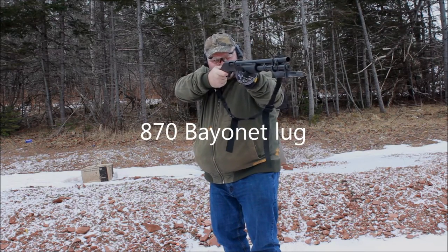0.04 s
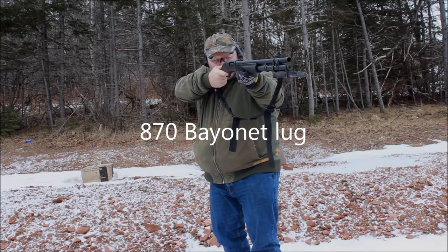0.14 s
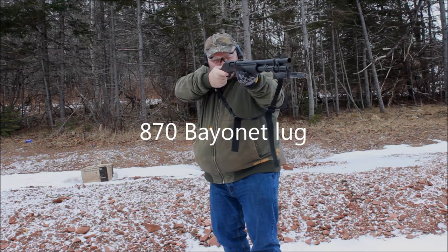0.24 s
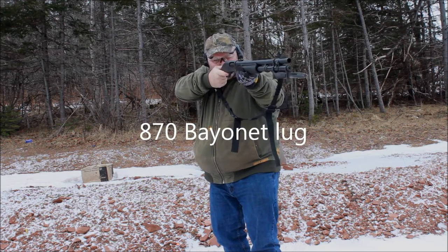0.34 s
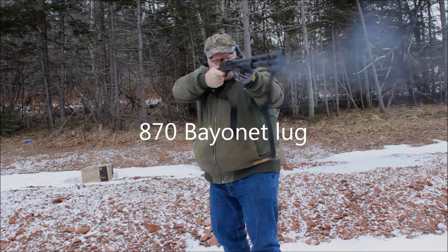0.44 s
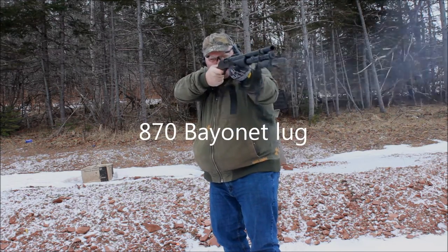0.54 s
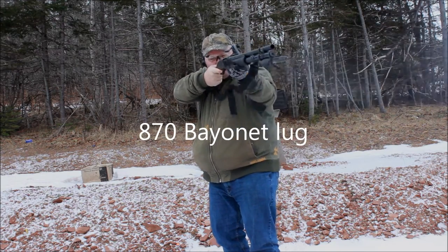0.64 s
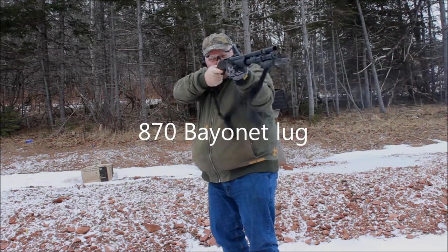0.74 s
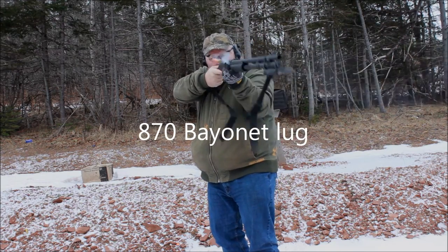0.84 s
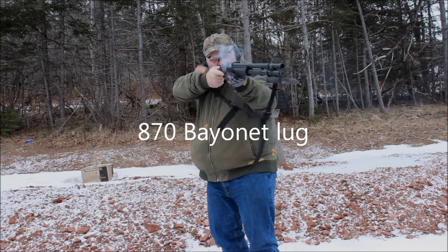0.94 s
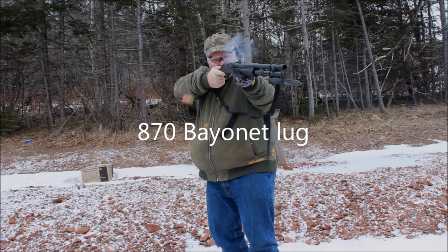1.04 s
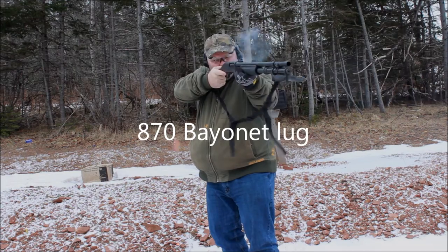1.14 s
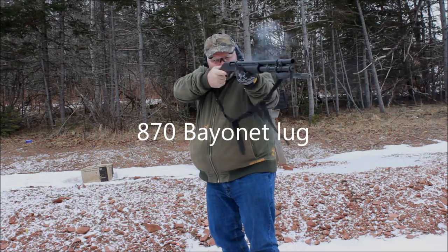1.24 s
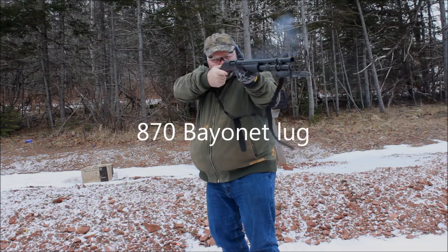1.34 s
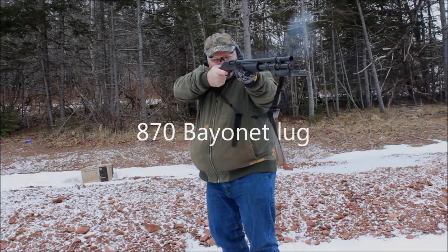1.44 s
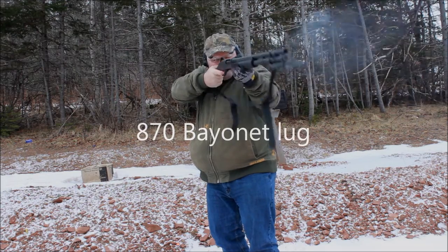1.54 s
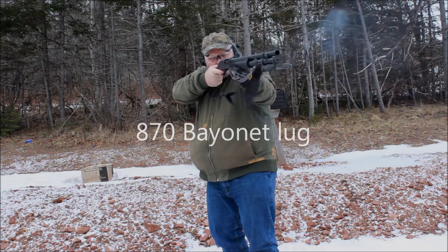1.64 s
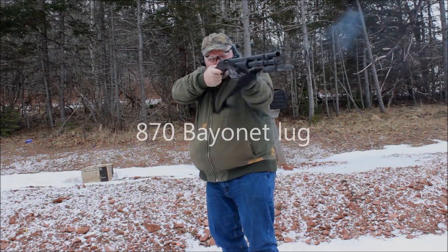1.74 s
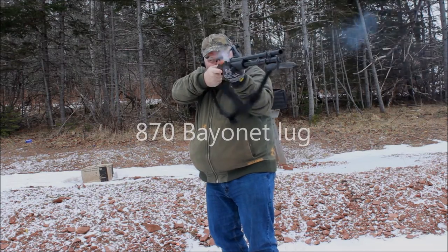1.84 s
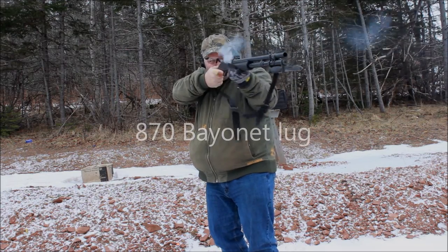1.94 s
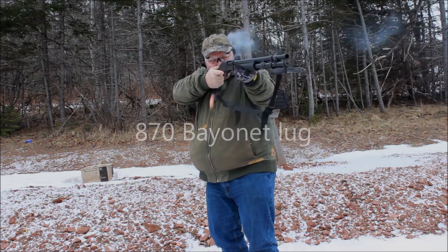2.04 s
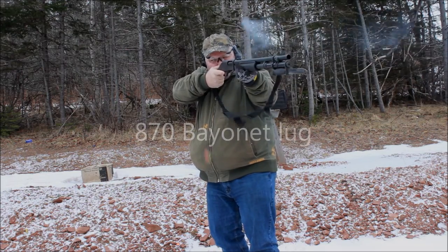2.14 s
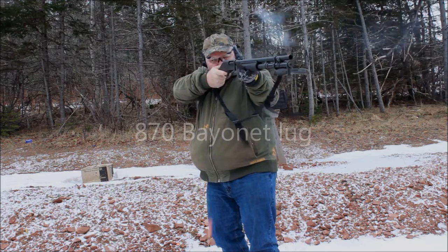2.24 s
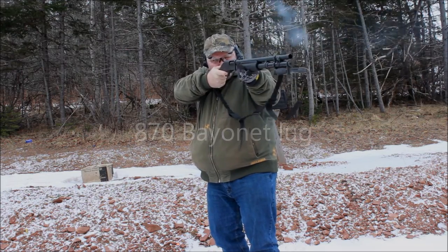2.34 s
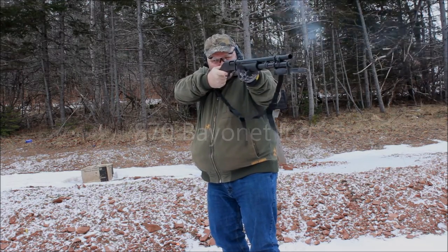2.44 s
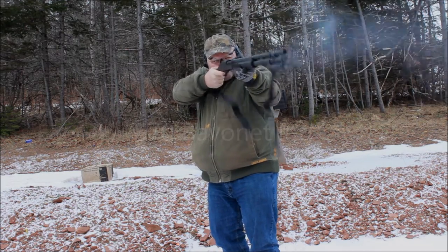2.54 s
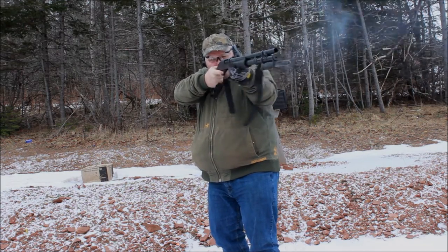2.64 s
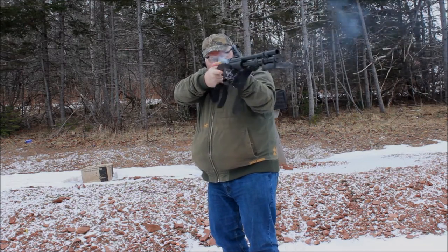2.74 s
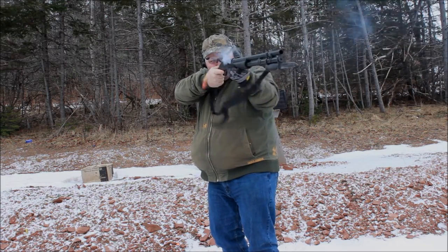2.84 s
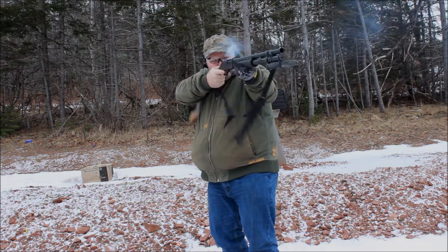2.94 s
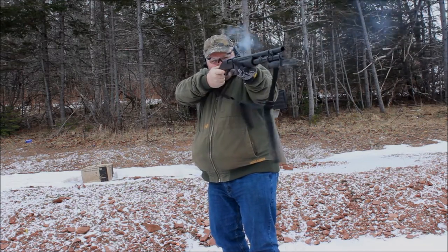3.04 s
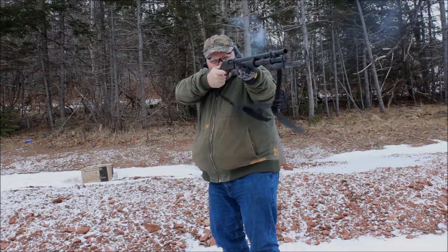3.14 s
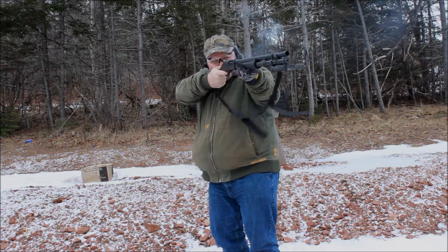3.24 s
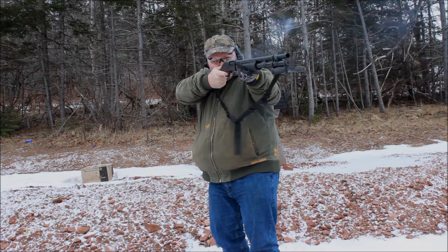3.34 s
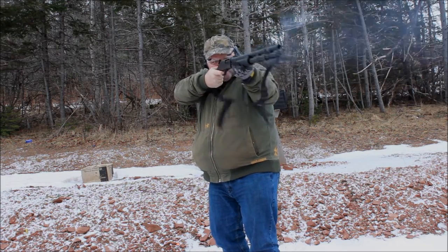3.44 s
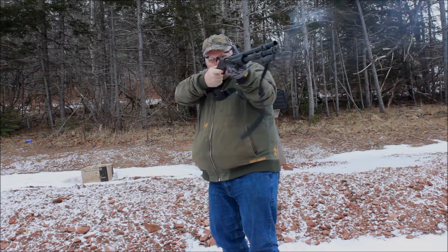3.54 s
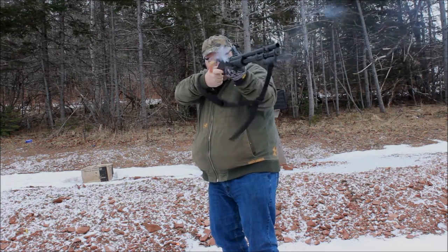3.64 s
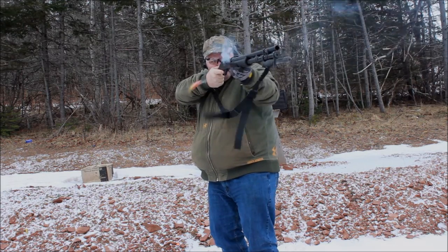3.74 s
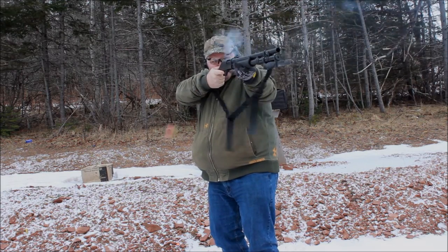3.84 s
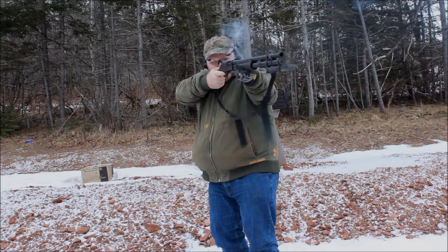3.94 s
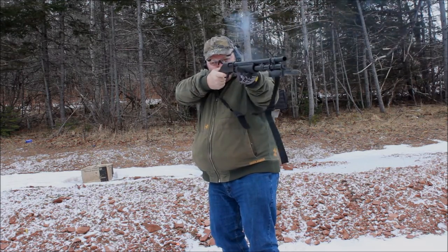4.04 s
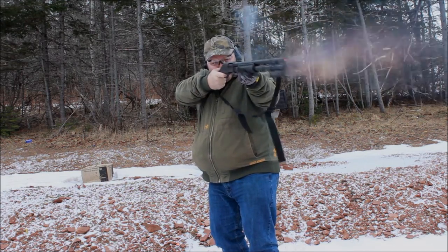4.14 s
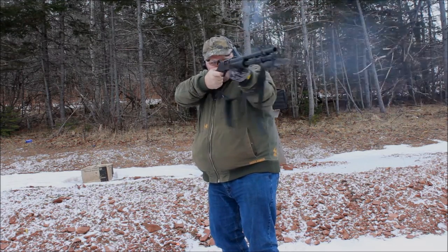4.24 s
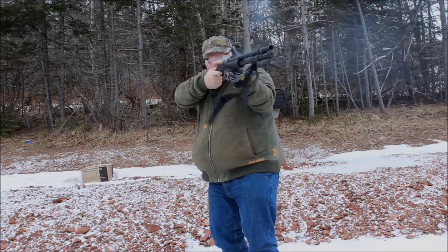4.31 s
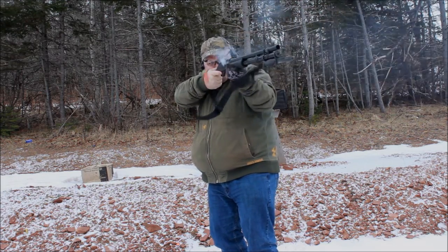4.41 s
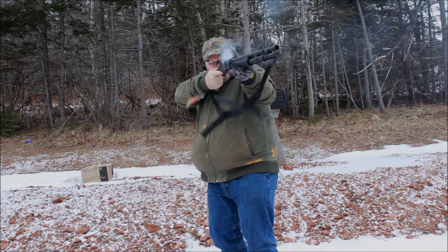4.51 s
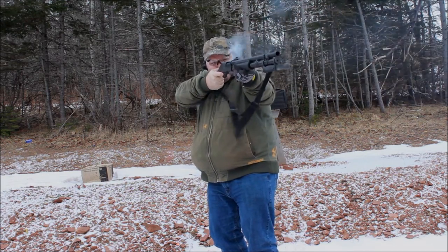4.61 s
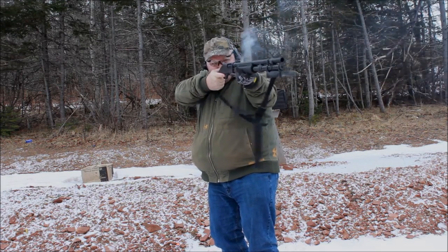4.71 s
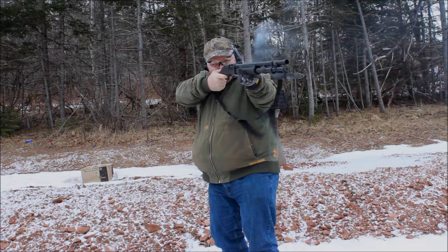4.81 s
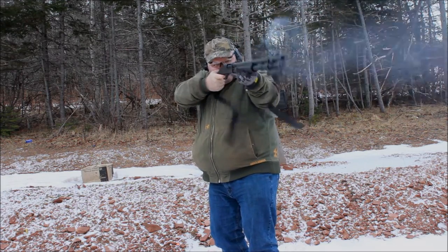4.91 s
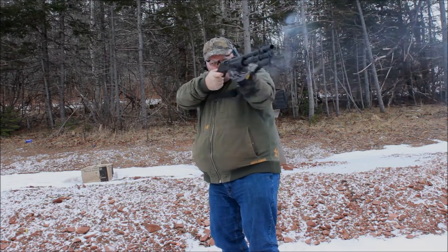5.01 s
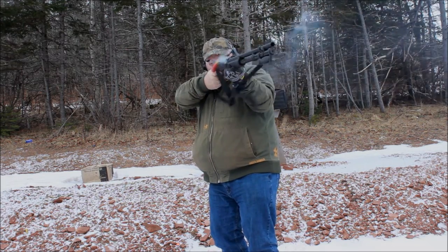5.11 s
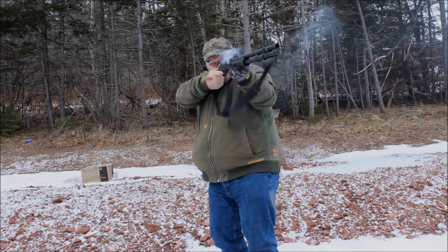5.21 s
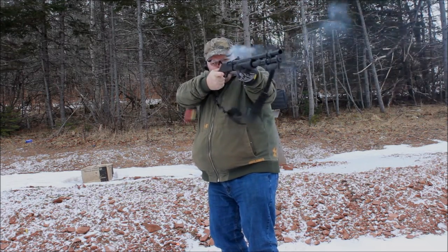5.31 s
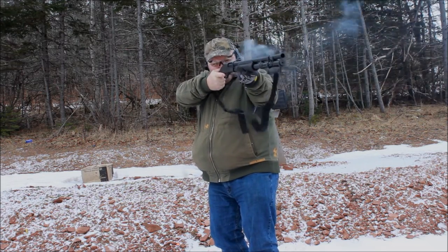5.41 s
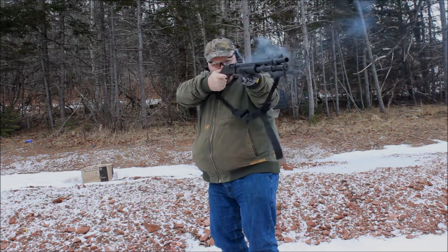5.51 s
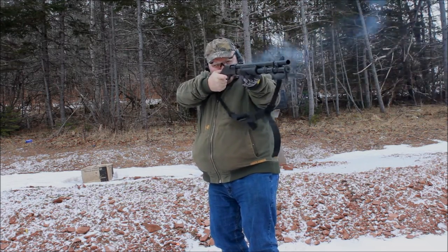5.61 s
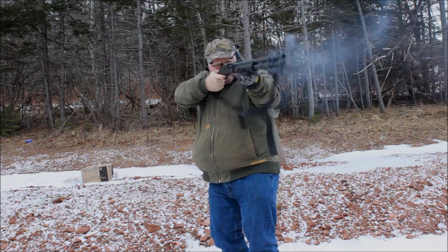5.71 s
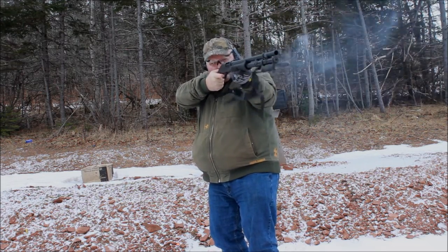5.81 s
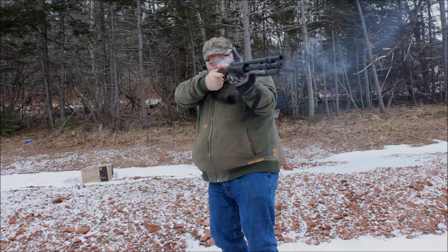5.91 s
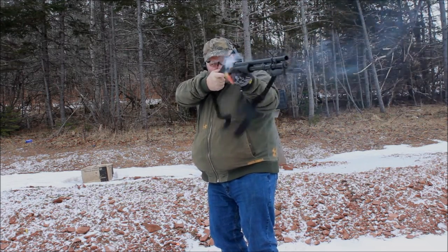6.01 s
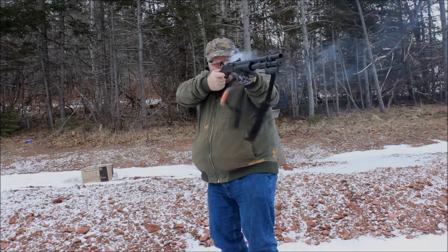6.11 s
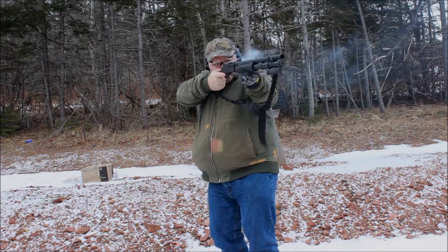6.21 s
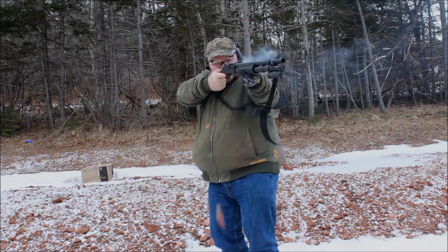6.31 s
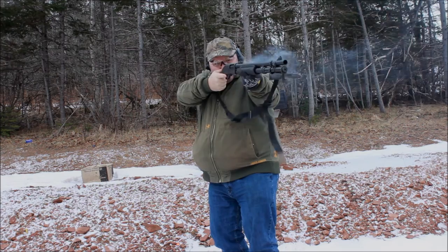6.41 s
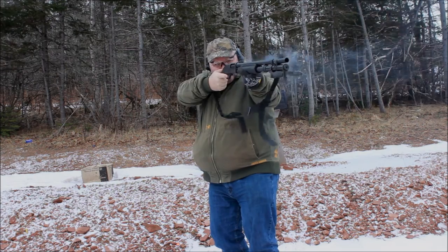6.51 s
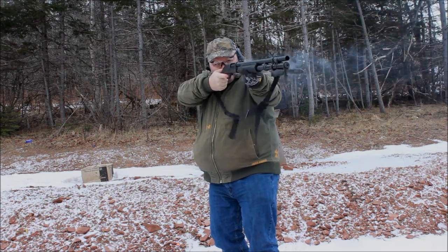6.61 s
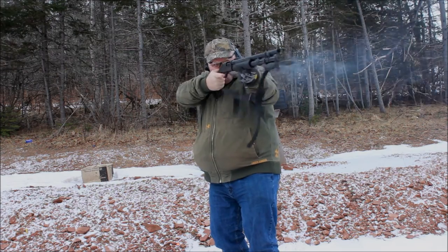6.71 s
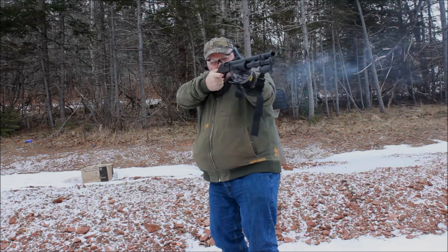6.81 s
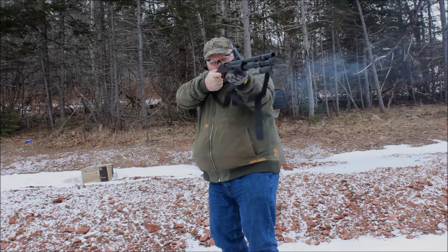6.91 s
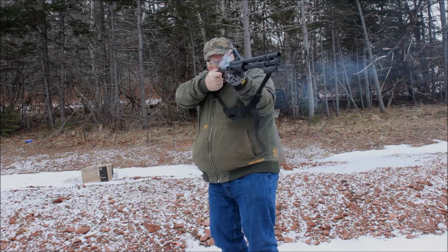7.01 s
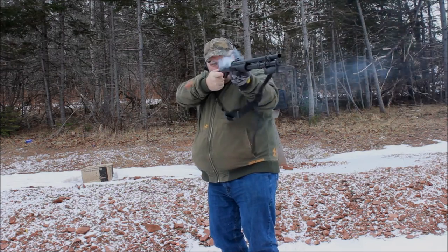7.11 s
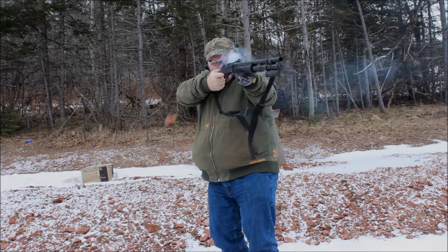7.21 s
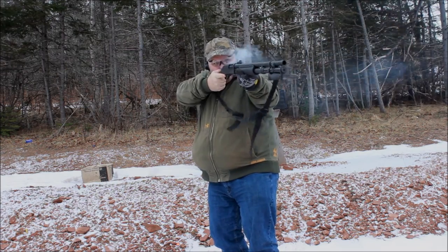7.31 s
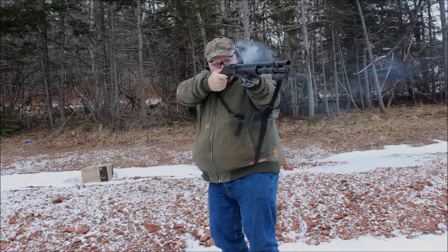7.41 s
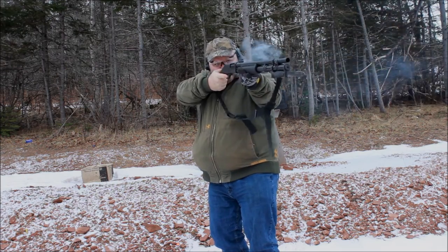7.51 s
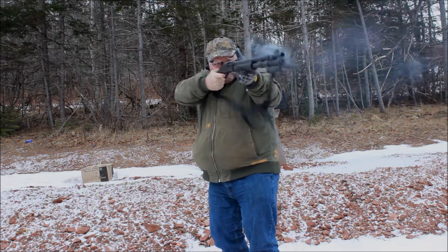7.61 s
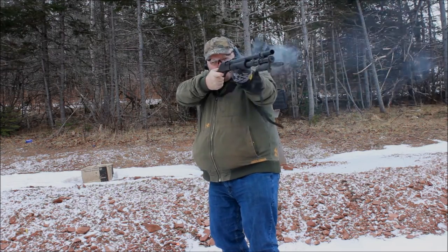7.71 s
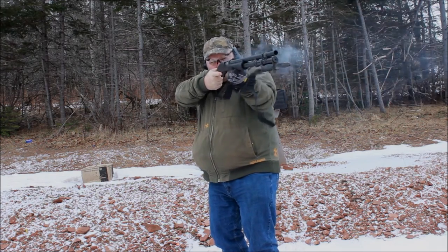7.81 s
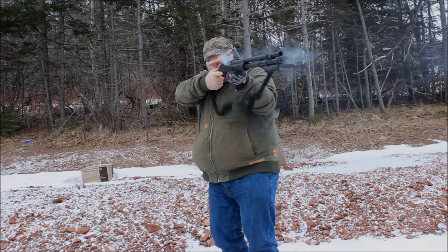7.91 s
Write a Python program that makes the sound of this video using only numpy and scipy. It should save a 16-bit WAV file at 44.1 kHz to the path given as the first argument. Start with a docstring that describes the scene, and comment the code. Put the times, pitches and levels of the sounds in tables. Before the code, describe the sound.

Outdoors beside trees, quick steady shotgun fire: hard distorted bang, brief crackling buzz, scattered echoes fading into a swelling distant rush. A two-part steel pump stroke, back then forward with small rattles, fills each gap, and some spent shells crack or pop hollowly on stones. Low wind rumbles underneath. The mono recorder ducks after each shot, then creeps back up.

```python
"""Light wind rumbles on the microphone at the edge of a wood, then a pump shotgun is fired nine times.
Each blast is an overloading burst of noise with a buzz off ground and trunks; decaying bands of noise
and delayed thumps and slaps answer from the trees and banks, and a dull roll swells until the next shot.
Between shots the slide scrapes, shaped noise and ringing modes make its steel contacts, and empty hulls
crack and pop on the gravel, while the recorder's gain control creeps back up."""
import sys
import numpy as np
from scipy import signal
from scipy.fft import rfft, irfft, next_fast_len
from scipy.io import wavfile
from scipy.ndimage import uniform_filter1d

SR = 44100
rng = np.random.default_rng(int(sys.argv[2]) if len(sys.argv) > 2 else 0)


def transcribe(signal):
    """Save signal, clipped to [-1, 1], as a 16-bit WAV file at the path in sys.argv[1]."""
    frames = np.atleast_2d(signal).T
    limited = np.clip(frames, -1, 1)
    pcm = np.round(limited * 32767).astype(np.int16)
    wavfile.write(sys.argv[1], SR, pcm)


N = 350595
TIME = np.arange(N) / SR

# Scene levels stand ahead of the recorder's gain; spectra give only a shape, as noise is set to rms 1.
# shots: start_s, blast_db, overload_s, buzz_db, buzz_delay_s, scatter_db, woods_db
SHOTS = [(0.4660, 11, 0.0086, -5.5, 0.012, -5.5, -14.5), (1.5359, 9.5, 0.009, -7.5, 0.023, -14.5, -12),
         (2.5465, 17.5, 0.0096, -6, 0.0072, -9.5, -13), (3.4066, 16, 0.0085, -5.5, 0.0062, -11.5, -15),
         (4.184, 10, .0078, -10, 0.0073, -8, -15), (4.9242, 14.5, 0.0076, -5.5, 0.011, -9.5, -14.5),
         (5.7200, 18.5, 0.007, -12.5, 0.024, -15, -14), (6.672, 18.5, 0.0073, -8.5, 0.0099, -8.5, -15),
         (7.6197, 15.5, 0.0078, -7.5, 0.0061, -6, -14.5)]
# pump strokes: slide_start_s, back_stop_s, stop_db, rebound_after_s, slam_s, slam_db, scrape_db
PUMPS = [(0.77, 0.856, -9, .051, 1.068, -7.5, -51), (1.774, 1.8444, -9, .057, 2.0297, -5, -46),
         (2.724, 2.7414, -17, .05, 2.942, -11, -51), (3.58, 3.605, -16, .046, 3.8107, -16, -57),
         (4.31, 4.3206, -17, .048, 4.5489, -11.5, -56), (5.07, 5.0888, -18.5, .044, 5.3105, -14, -59),
         (5.9, 5.9105, -17, .041, 6.2437, -15.5, -61), (6.93, 6.981, -14, .045, 7.219, -8, -54),
         (7.805, 7.875, -13, .056, 8.11, -10, -65)]
# noise of steel on steel: pitch_hz, relative_db
STEEL_NOISE = [(290, -26), (500, -9), (1620, -2.5), (2840, -4), (4390, -1.5), (5700, -7), (7190, -4),
               (9200, -9.5), (15100, -11.5), (16000, -8.5)]


def from_db(db):
    """Turn decibels into an amplitude factor."""
    return 10 ** (np.asarray(db) / 20)


def rms_one(x):
    """Scale a signal to rms 1."""
    return x / np.sqrt(np.mean(x ** 2) + 1e-20)


def at_hz(points, hz):
    """Read a curve of (hz, value) points, straight between them on a log frequency axis."""
    point_hz, value = np.array(points).T
    return np.interp(np.log(hz), np.log(point_hz), value)


def clicks(times, heights):
    """One sample for each event."""
    out = np.full(N, 1e-18)
    np.add.at(out, (np.asarray(times) * SR).astype(int), heights)
    return out


def dying(pulses, t60):
    """Each pulse starts an exponential decay of 60 dB in t60 seconds."""
    return signal.lfilter([1], [1, -from_db(-60 / (t60 * SR))], pulses)


def ring(pulses, hz, t60):
    """A unit click sets a decaying sine of starting height 1 ringing."""
    r = from_db(-60 / (t60 * SR))
    w = 2 * np.pi * hz / SR
    return signal.lfilter([0, np.sin(w)], [1, -2 * r * np.cos(w), r * r], pulses)


def drift(rate_hz):
    """Slow random wander with spread 1, made at one fortieth of the sample rate."""
    r = np.exp(-80 * np.pi * rate_hz / SR)
    noise = rng.standard_normal(N // 40 + 2002)
    slow = signal.lfilter([1], [1, -2 * r, r * r], noise)[2000:]   # skip the filter's start
    return np.interp(np.arange(N) / 40, np.arange(len(slow)), rms_one(slow))


def coloured(spectrum):
    """Steady noise of the given spectrum, rms 1."""
    size = next_fast_len(N)
    hz = np.maximum(np.arange(size // 2 + 1) * SR / size, 1)
    shaped = rfft(rng.standard_normal(size)) * from_db(at_hz(spectrum, hz))
    return rms_one(irfft(shaped, size)[:N])


def after_shots(response):
    """The same answer follows every shot, scaled by that shot's woods level."""
    size = next_fast_len(N + len(response))
    start = clicks([row[0] for row in SHOTS], from_db([row[6] for row in SHOTS]))
    return irfft(rfft(start, size) * rfft(response, size), size)[:N]


def wind_and_low_tails():
    """Lumpy wind rumble, mostly below 150 Hz, joined by the low rumbling tail of each shot."""
    # light wind on the microphone: time_s, level_db
    gusts = [(0.0, -64), (0.6, -65), (1.1, -58), (1.9, -55), (2.6, -56), (2.85, -63), (3.3, -58),
             (4.0, -61), (4.8, -56), (5.3, -65), (6.2, -58), (7.0, -67), (7.45, -64), (7.52, -54),
             (7.95, -62)]
    s, level_db = np.transpose(gusts)
    tail_db, tail_t60_s = -32, .65   # level over the shot's woods level
    low_tails = after_shots(from_db(tail_db - 60 * TIME[:SR] / tail_t60_s))
    level = from_db(np.interp(TIME, s, level_db)) + low_tails
    rumble = coloured([(15, -44), (40, -15.5), (85, 0), (130, -1), (250, -27), (1000, -85)])
    return level * from_db(1.3 * drift(4.9)) * rumble


def open_air():
    """A faint bed of noise, strongest between 400 and 800 Hz, wavers slightly in level."""
    # background spectrum: pitch_hz, relative_db
    air_spectrum = [(60, -18), (150, -9), (400, -3.5), (800, -4.5), (2000, -18), (5000, -23.5),
                    (16000, -30.5)]
    return from_db(-59 + 1.0 * drift(3)) * coloured(air_spectrum)


def muzzle():
    """The blast holds for a few ms, bright first, then deep; ground and trunks send back a buzz near 1 kHz."""
    # spectrum of the deep blast: pitch_hz, relative_db
    blast_spectrum = [(20, -29.5), (60, -12.5), (200, -0.5), (900, -1), (2500, -7), (6000, -13),
                      (16000, -22)]
    # spectrum of the bright scatter: pitch_hz, relative_db
    scatter_spectrum = [(35, -34), (60, -27), (635, -14.5), (1110, -2.5), (1540, -5.5), (2290, -4),
                        (2580, -22), (2900, -7.5), (12600, -27.5), (16000, -26.5)]
    buzz_hz, buzz_width_hz, buzz_end_s = 960, 330, .033   # end counted from the shot
    crack, boom, ground, rush = np.zeros((4, N))
    for s, blast_db, overload_s, buzz_db, delay_s, rush_db, _ in SHOTS:
        t = TIME - s
        rise = np.exp(np.minimum(t, 0) / .00013)
        hold = from_db(blast_db) * rise * np.exp(-np.maximum(t - overload_s, 0) / 0.0005)
        crack += hold * np.exp(-t.clip(0) / 0.0021)
        boom += hold
        swell = 1 / (1 + np.exp(np.clip((delay_s - t) / .001, -50, 50)))
        end = np.exp(-np.maximum(t - buzz_end_s, 0) / .002)
        ground += swell * from_db(buzz_db - 120 * (t - delay_s).clip(0)) * end
        rush += np.where(t > 0, from_db(rush_db - 480 * (t - overload_s).clip(0)), 0)
    narrow = ring(rng.standard_normal(N), buzz_hz, 2.4 / buzz_width_hz)
    buzz = np.tanh(1.3 * rms_one(narrow))   # the strained capsule evens the swing
    buzz = buzz - 0.55 * (buzz ** 2 - np.mean(buzz ** 2))   # and sharpens the rarefactions
    bright = coloured([(300, -16), (2500, 1), (8000, -3.5), (16000, -4.5)])
    blast = boom * coloured(blast_spectrum) + from_db(-5.5) * crack * bright
    return blast + ground * buzz + rush * coloured(scatter_spectrum)


def woods():
    """Scatter from the trees dies band by band, quick then slow; the treble swells again from the crowns."""
    # spectrum of the scatter: pitch_hz, relative_db
    woods_spectrum = [(24, -54), (40, -20), (189, -3), (354, -1.5), (630, -2), (917, 7), (988, -8),
                      (1300, -5), (1670, -7.5), (4790, -18.5), (16000, -38.5)]
    # decay scale, shortened or stretched below for the quick and slow parts: pitch_hz, decay_scale_s
    woods_decay = [(50, .5), (200, 0.73), (500, 0.46), (1000, 0.38), (2500, 1), (5000, 0.89), (9000, 0.44),
                   (15000, 0.45)]
    start = clicks([row[0] + 0.014 for row in SHOTS], from_db([row[6] for row in SHOTS]))
    noise, out = [coloured(woods_spectrum), coloured(woods_spectrum)], 0
    edges = 35 * 2 ** np.arange(0, 9.1, .5)   # half-octave bands
    for k, (low, high) in enumerate(zip(edges, edges[1:])):
        band_filter = signal.butter(2, [low, high], "band", fs=SR, output="sos")
        band = signal.sosfilt(band_filter, noise[k % 2])   # neighbours use separate noises
        decay_s = at_hz(woods_decay, np.sqrt(low * high))
        quick = from_db(-4.5) * dying(start, .2 * decay_s)
        slow = from_db(-8.5) * dying(start, 1.685 * decay_s)
        out = out + band * (quick + slow)
    crowns_s, crowns_width_s = 0.078, 0.032   # peak after the shot and width of the swell
    crowns = after_shots(from_db(-21) * np.exp(-((TIME[:SR // 4] - crowns_s) / crowns_width_s) ** 2))
    treble = coloured([(1000, -18.5), (3000, 1.5), (8000, -4.5), (16000, -18.5)])
    return out * from_db(2.1 * drift(30)) + crowns * treble


def echoes():
    """Each reflector returns a soft low thump and a short slap of the middle range."""
    # banks, stands of trees and the backstop answer every shot alike: delay_s, thump_db, slap_db
    reflectors = [(.030, -14, -21), (0.042, -17, -8), (0.055, -27, -14), (.062, -15, -8.5),
                  (.082, -25, -11), (.100, -30, -27), (.128, -20, -14), (0.144, -20, -22), (.166, -29, -35),
                  (.176, -9.5, -15), (.191, -29, -20.5), (0.209, -18.5, -17.5), (.225, -15, -16),
                  (.236, -18, -29), (0.251, -22.5, -24.5)]
    # low modes of the thump: pitch_hz, relative_db, t60_s
    thump_modes = [(140, -7, 0.024), (235, 2.5, .065), (310, -1, 0.035)]
    delay_s, thump_db, slap_db = np.transpose(reflectors)
    soft = signal.lfilter([.05], [1, -.95], clicks(delay_s, from_db(thump_db)))
    thump = sum(from_db(level_db) * ring(soft, hz, t60) for hz, level_db, t60 in thump_modes)
    thump = signal.sosfilt(signal.butter(3, [110, 450], "band", fs=SR, output="sos"), thump)
    smear = dying(dying(clicks(delay_s, from_db(slap_db)), 0.021), 0.021) / 60
    middle = coloured([(300, -21), (700, -0.5), (1000, -1), (2000, -5.5), (4000, -24), (9000, -45.5)])
    return after_shots((thump + smear * middle)[:SR // 2])


def far_roll():
    """Distant slopes return a dull, lumpy rush that is reset at each shot and swells until the next."""
    # spectrum of the distant rush: pitch_hz, relative_db
    far_spectrum = [(88, -46.5), (150, -12.5), (298, -13.5), (449, -9.5), (489, -9), (891, 0), (1060, -1.5),
                    (1390, -9), (2030, -8), (2210, -13.5), (3890, -27), (4460, -35.5), (9000, -70.5),
                    (11700, -99), (19800, -120)]
    roll_db, swell_db_per_s = -27, 6.5   # just after a shot, over its woods level; growth until the next
    s, woods_db = np.transpose(SHOTS)[[0, 6]]
    last = np.maximum(np.searchsorted(s, TIME) - 1, 0)
    after_first = np.clip((TIME - s[0]) / .05, 0, 1)
    level_db = woods_db[last] + roll_db + swell_db_per_s * (TIME - s[last])
    return after_first * from_db(level_db + 2.0 * drift(43)) * coloured(far_spectrum)


def slide():
    """The action bars scrape along the receiver in dense, uneven ticks."""
    stroke = np.zeros(N)
    for start_s, _, _, _, slam_s, _, scrape_db in PUMPS:
        inside_s = np.minimum(TIME - start_s, slam_s + .012 - TIME)
        stroke += from_db(scrape_db) * np.clip(inside_s / .03, 0, 1)
    heights = from_db(2.1 * np.minimum(rng.exponential(1, N), 3))
    ticks = (rng.random(N) < 150 / SR) * heights   # about 150 a second
    grit = rms_one(dying(ticks + 1e-18, .04) + 0.39)
    return stroke * grit * coloured(STEEL_NOISE)


def contacts():
    """Every steel contact of the action as rows: time_s, level_db, decay_scale_s."""
    # small ticks of the action, unlocking among them: time_s, level_db
    small_ticks = [(0.7781, -30), (0.8265, -34), (0.9717, -26), (0.9946, -25.5), (1.0316, -29),
                   (1.2466, -38.5), (1.784, -20), (1.938, -26), (1.9494, -26), (1.965, -28), (2.5042, -40),
                   (2.8394, -34), (2.876, -23), (3.72, -32), (3.745, -30), (4.401, -37), (4.4757, -33),
                   (4.634, -33.5), (5.21, -33), (5.238, -25.5), (6.0297, -31), (6.0543, -27), (6.099, -37),
                   (6.1434, -33.5), (6.549, -40.5), (6.9434, -36), (7.1085, -30), (7.1372, -30),
                   (7.1631, -38), (7.183, -31), (7.4195, -36.5), (7.8341, -35)]
    # rebound after the back stop: level_under_stop_db, decay_scale_s
    rebound_db, rebound_decay_s = (-12.5, .055)
    # carrier before the slam, lock after it: lag_s, level_under_slam_db, decay_scale_s
    carrier, lock = (-.022, -17, .045), (.0075, -5, .055)
    stop_decay_s, slam_decay_s, tick_decay_s = .053, .047, .05
    rows = [(s, db, tick_decay_s) for s, db in small_ticks]
    for _, stop_s, stop_db, rebound_s, slam_s, slam_db, _ in PUMPS:
        rows.append((stop_s, stop_db, stop_decay_s))
        rows.append((slam_s, slam_db, slam_decay_s))
        rows.append((stop_s + rebound_s, stop_db + rebound_db, rebound_decay_s))
        rows += [(slam_s + lag_s, slam_db + db, decay_s) for lag_s, db, decay_s in (carrier, lock)]
    return [row for row in rows if row[0] < (N - 100) / SR]


def action():
    """Each contact is a quick clatter of steel with a fainter rattle after it, ringing the receiver's modes."""
    # modes of the receiver: pitch_hz, relative_db, t60_s
    steel_modes = [(3290, -5, 0.034), (4700, -22, 0.019), (5240, -14.5, 0.021), (6440, -8, .04),
                   (7860, -17.5, .03)]
    rows = contacts()
    envelope = np.zeros(N)
    for s, level_db, decay_s in rows:
        i = int(s * SR)
        t = TIME[:min(SR // 4, N - i)]
        clatter = from_db(-60 * t / (.5 * decay_s))
        rattle = from_db(-17 - 60 * t / (1.83 * decay_s))
        tail = from_db(-40 - 60 * t / (7.0 * decay_s))
        rise = 1 - np.exp(-t / 0.0011)
        envelope[i:i + len(t)] += from_db(level_db - 5.5) * (clatter + rattle + tail) * rise
    grain = from_db(np.repeat(rng.uniform(-4, 4, N // 24 + 1), 24)[:N])   # tiny uneven contacts
    out = envelope * grain * coloured(STEEL_NOISE)
    s, level_db, _ = np.transpose(rows)
    chance_db = rng.normal(0, 1.44, (len(s), len(steel_modes)))   # every contact excites the modes unevenly
    for k, (hz, mode_db, t60) in enumerate(steel_modes):
        strikes = clicks(s + 0.001192, from_db(level_db + mode_db - 10.5 + chance_db[:, k]))
        out += ring(strikes, hz, t60)
    return out


def hulls():
    """A sharp crack of brass on stone, a faint rattle and the hollow pop of the plastic tube."""
    # empty hulls landing: time_s, crack_db, hollow_ring_db
    landings = [(1.4476, -9.5, 0.5), (2.4321, -23.5, -32), (3.3115, -22.5, -41), (3.3212, -32, -41),
                (4.9129, -21, -11.5), (5.681, -29.5, -22), (6.5253, -24.5, -37), (7.5831, -14, -8)]
    # modes of the hollow tube: pitch_hz, relative_db, t60_s
    tube_modes = [(1280, -3, .035), (1480, -5, .014), (2300, -9, .008), (3900, -11, .010)]
    s, crack_db, ring_db = np.transpose(landings)
    hit = clicks(s, from_db(crack_db))
    brass = coloured([(900, -29.5), (1600, -1), (3500, -3.5), (9000, -2.5), (16000, -16.5)])
    crack = (dying(hit, 0.0059) + from_db(-23) * dying(hit, .03)) * brass
    pop = sum(ring(clicks(s, from_db(ring_db + mode_db)), hz, t60) for hz, mode_db, t60 in tube_modes)
    return crack + signal.sosfilt(signal.butter(4, 1000, "high", fs=SR, output="sos"), pop)


def scene():
    """Everything that reaches the single microphone."""
    shots = muzzle() + woods() + echoes() + far_roll()
    handling = slide() + action() + hulls()
    return (wind_and_low_tails() + open_air() + shots + handling)[None]


def record(dry):
    """Loud sound pulls the gain down in ms and it climbs back slowly; the input clips; the top is cut."""
    threshold_db, gain_range_db, release_db_per_s, attack_s = -9, 12.5, 6.5, 0.0064
    level_db = 10 * np.log10(uniform_filter1d(dry ** 2, 128) + 1e-12)
    cut_db = np.clip(3.6 * (level_db - threshold_db), 0, gain_range_db)
    # the deepest cut so far is held, easing off at the release rate
    climb_db = release_db_per_s * TIME
    held_db = np.maximum.accumulate(cut_db + climb_db, axis=1) - climb_db
    r = np.exp(-1 / (attack_s * SR))
    held_db = signal.lfilter([1 - r], [1, -r], np.maximum(held_db, 0))
    clipped = np.clip(dry * from_db(gain_range_db - 3 - held_db), -.94, .94)
    top_cut = signal.cheby2(16, 55, 16150, fs=SR, output="sos")   # 55 dB down from 16150 Hz up
    return np.clip(signal.sosfilt(top_cut, clipped), -1, 1)


dry = scene()
out = record(dry)
transcribe(out)
```